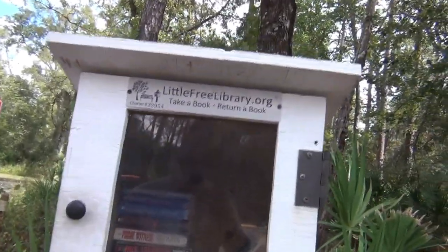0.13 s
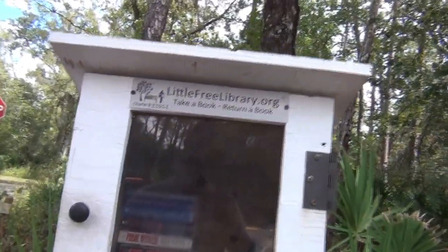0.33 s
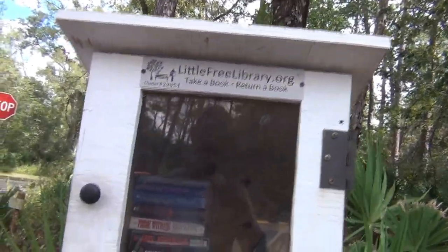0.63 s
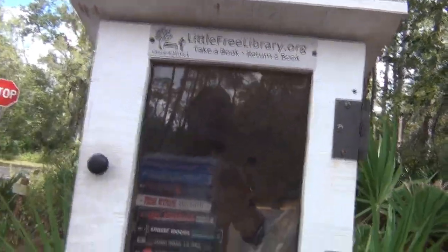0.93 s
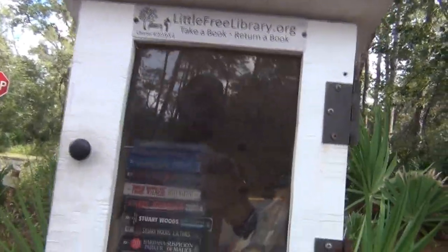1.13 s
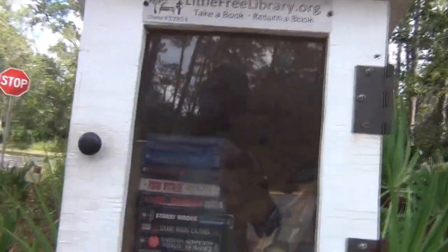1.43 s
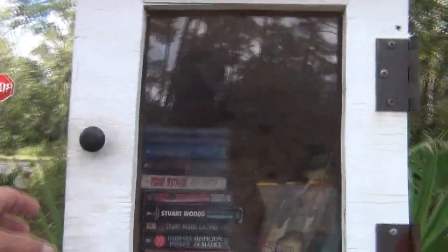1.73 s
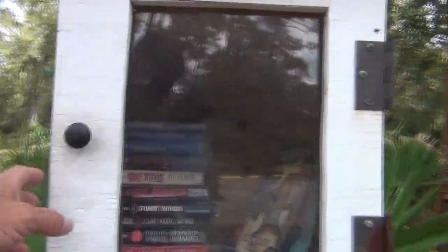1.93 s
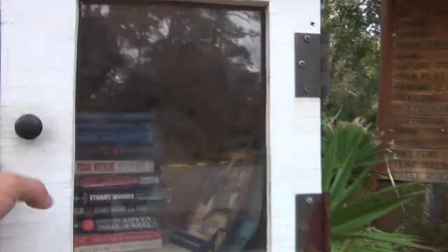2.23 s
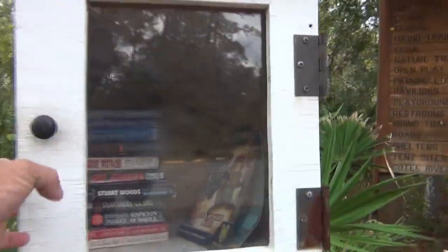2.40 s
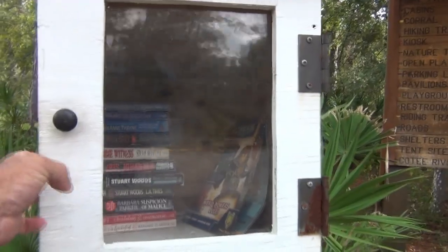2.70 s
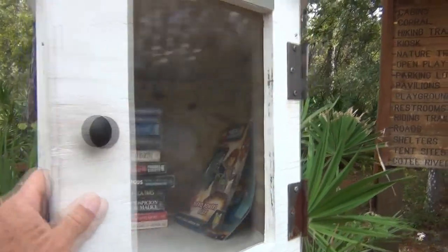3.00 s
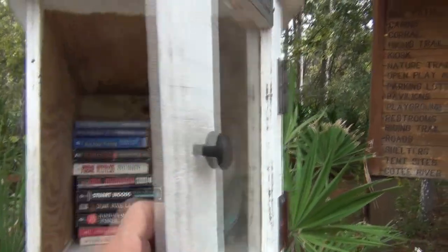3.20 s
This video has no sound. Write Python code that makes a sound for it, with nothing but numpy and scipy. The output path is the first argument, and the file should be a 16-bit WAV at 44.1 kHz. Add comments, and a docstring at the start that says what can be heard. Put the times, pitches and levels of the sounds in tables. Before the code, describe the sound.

A dry metal hinge squeals piercingly, then groans downward as a small wooden door opens outdoors

```python
"""Dry door hinge in the wind

Outdoors among trees, wind buffets a hand-held stereo microphone; feet scuff dry leaves. Twigs, strap and fingers
tick, after one faint bird chirp at the start. A hand pulls a small wooden door off its seat: the hinge chirps,
locks onto two high squeals, then slips into a lower groan that falls as the swing slows. Hinge: unsteady sines in
stick-slip; door: struck panel modes; leaves: ringing grains and noise; ticks and bird: dying bursts of
band noise; wind, flaps and air: shaped noise."""
import sys
import numpy as np
from scipy import signal
from scipy.fft import rfft, irfft
from scipy.io import wavfile
from scipy.ndimage import uniform_filter1d

SR = 44100
rng = np.random.default_rng(int(sys.argv[2]) if len(sys.argv) > 2 else 0)


def invert_db(x):
    """Field ratio 10**(x/20) for x, a level in decibels (scalar or array-like)."""
    u = np.asarray(x, float) / 20
    return 10 ** u


def generate_wav(sig):
    """Save sig (samples, or channels by samples) to the path in sys.argv[1] as 16-bit PCM at SR."""
    pcm = np.round(np.clip(np.atleast_2d(sig).T, -1, 1) * 32767).astype(np.int16)
    wavfile.write(sys.argv[1], SR, pcm)


N = 147735


def rms_one(x):
    """Scale to rms 1."""
    return x / np.sqrt(np.mean(x ** 2) + 1e-20)


def in_time(rows):
    """Columns of a table at every sample; the first column is time in seconds."""
    s, *columns = np.transpose(rows)
    return [np.interp(np.arange(N) / SR, s, c) for c in columns]


def within(rows):
    """1 during the table's span, with 3 ms edges."""
    t = np.arange(N) / SR
    edge_s = .003
    return np.clip(np.minimum(t - rows[0][0], rows[-1][0] + edge_s - t) / edge_s, 0, 1)


def at_hz(points, hz):
    """A spectrum read on a log frequency axis."""
    point_hz, values = np.transpose(points)
    return np.interp(np.log(hz), np.log(point_hz), values)


def drift(corner_hz):
    """Slow chance, spread 1: white noise through two equal one-pole lowpasses."""
    r = np.exp(-2 * np.pi * corner_hz / SR)
    noise = rng.standard_normal(N + SR)
    return rms_one(signal.lfilter([1], [1, -2 * r, r * r], noise)[SR:])


def colour(x, spectrum):
    """Shape a signal by a spectrum in dB."""
    n = x.shape[-1]
    bin_hz = np.arange(n // 2 + 1) * SR / n + 1
    return irfft(rfft(x) * invert_db(at_hz(spectrum, bin_hz)), n)


def stereo_noise(spectrum, alike):
    """Coloured noise with a left-right likeness per frequency; rms 1."""
    c = np.clip(at_hz(alike, np.arange(N // 2 + 1) * SR / N + 1), 0, 1)
    mid, side = rfft(rng.standard_normal((2, N)))
    pair = np.sqrt(1 + c) * mid + np.sqrt(1 - c) * side * [[1], [-1]]
    return rms_one(colour(irfft(pair, N), spectrum))


def pan(x, db):
    """Left louder than right by db; mono becomes two channels."""
    return x * invert_db(np.array([[db / 2], [-db / 2]]))


def ring(clicks, hz, t60_s):
    """A unit click sets a dying sine of height 1 ringing."""
    r, w = invert_db(-60 / (t60_s * SR)), 2 * np.pi * hz / SR
    return signal.lfilter([0, np.sin(w)], [1, -2 * r * np.cos(w), r * r], clicks + 1e-18)


def tone(hz, partials_db, rough=1.0):
    """Sines at multiples of an unsteady pitch; partials_db holds (multiple, rms dB), rough scales both wavers."""
    jitter_hz = rough * 8.8 * drift(500)
    waver_db = rough * .35 * drift(80)
    phase = 2 * np.pi * np.cumsum(hz + jitter_hz) / SR
    partials = sum(np.sqrt(2) * invert_db(db) * np.sin(k * phase + k * k) for k, db in partials_db)
    return invert_db(waver_db) * partials


def squeals():
    """Stick-slip locked onto modes of the pin: near sines."""
    # Lower pin mode. Each row: time in seconds, pitch in Hz, levels of partials 1, 2 and 3 in dB.
    chirp = [(2.82, 4360, -50, -62, -68), (2.827, 4360, -25, -52, -42), (2.834, 4360, -17.5, -53, -42),
             (2.839, 4500, -33, -60, -55), (2.841, 4600, -21, -42, -38), (2.845, 4540, -34, -39, -37),
             (2.849, 4590, -25, -33, -34), (2.853, 4620, -24, -36, -36), (2.856, 4670, -10.5, -35, -36),
             (2.860, 4670, -20, -37, -36), (2.862, 4700, -18, -55, -54), (2.868, 4730, -35, -66, -72),
             (2.875, 4600, -40, -73, -72), (2.885, 4630, -51, -75, -85)]
    # Lower pin mode, two stretches in turn. Each row: time in seconds, pitch in Hz, partials 1, 2 and 3 in dB.
    squeak = [
        [(2.906, 5130, -22, -51, -51), (2.912, 4910, -12, -31, -31), (2.92, 4918, -11, -28, -28),
         (2.934, 4892, -10, -25.5, -21), (2.94, 4850, -24, -44, -42)],
        [(2.94, 5020, -14, -38, -42), (2.946, 4840, -35, -62, -64), (2.954, 4930, -34.5, -54, -70),
         (2.97, 4917, -57, -85, -73), (2.98, 4850, -50, -70, -67), (3.01, 4929, -67, -67, -106)],
    ]
    # Long squeal on the upper pin mode. Each row: time in seconds, pitch in Hz, level in dB.
    squeal = [(2.934, 11150, -42), (2.938, 11160, -20), (2.943, 11490, -8), (2.955, 11530, -12),
              (2.966, 11560, -11), (2.973, 11570, -9.5), (2.988, 11590, -13), (2.998, 11420, -10),
              (3.006, 11440, -10.5), (3.03, 11480, -10.5), (3.05, 11460, -10.5), (3.08, 11540, -10),
              (3.1, 11540, -9), (3.126, 11520, -10.5), (3.131, 11300, -21), (3.143, 11470, -28.5),
              (3.157, 11260, -35), (3.16, 11540, -46), (3.185, 11550, -54), (3.25, 11250, -65)]
    # Rising blip flung by the jump between the squeals. Each row: time in seconds, pitch in Hz, level in dB.
    blip = [(2.935, 5200, -41), (2.939, 6100, -33), (2.943, 6500, -43), (2.948, 6600, -55)]
    # Falling whistle riding on the groan. Each row: time in seconds, pitch in Hz, level in dB.
    whistle = [(3.23, 8883, -54), (3.264, 8483, -47), (3.276, 8493, -65), (3.28, 8340, -45),
               (3.31, 8070, -48), (3.338, 7580, -45), (3.35, 7669, -52)]
    # Mode that beats with the long squeal. Each row: time in seconds, pitch in Hz, level in dB.
    neighbour = [(2.94, 12584, -50), (2.95, 12568, -65), (2.988, 12670, -23), (3.0, 12564, -39),
                 (3.016, 12500, -58), (3.126, 12493, -49), (3.132, 12400, -59), (3.15, 12300, -40),
                 (3.16, 12506, -72)]
    voices = ((chirp, 2.0), (np.vstack(squeak), .6), (squeal, 1.2), (blip, 5.0), (whistle, 6.0))
    out = 0
    for rows, rough in voices:
        hz, *levels_db = in_time(rows)
        levels_db = uniform_filter1d(np.array(levels_db), size=60)
        out = out + within(rows) * tone(hz, enumerate(levels_db, 1), rough=rough)
    hz, db = in_time(neighbour)
    upper = tone(hz, [(1, db)], rough=2.7)
    # the neighbour's image below the long squeal, 9 dB weaker and 1 % flat
    mirror_hz = 2 * in_time(squeal)[0] - hz
    mirror = tone(mirror_hz, [(0.99, db - 9)], rough=2.9)
    return out + within(neighbour) * (upper + mirror)


def groan():
    """A harmonic stack at the slip rate; the higher a partial, the more it flickers on its own."""
    # Slips of the hinge. Each row: time in seconds, rate in Hz.
    slip_rate = [(3.06, 1070), (3.088, 1020), (3.1, 975), (3.122, 937), (3.14, 895), (3.17, 915),
                 (3.182, 880), (3.203, 837), (3.215, 860), (3.25, 868), (3.3, 885), (3.31, 857),
                 (3.322, 810), (3.35, 775)]
    # Partials of the groan. Each row: time in seconds, levels of partials 1 to 8 in dB.
    partial_rows = [(3.06, -59, -80, -80, -80, -80, -80, -80, -80),
                    (3.082, -45, -65, -75, -72, -72, -80, -80, -80),
                    (3.09, -38, -54, -72, -75, -80, -80, -80, -80),
                    (3.1, -33, -49, -62, -65, -72, -80, -80, -80),
                    (3.112, -28, -42, -52, -66, -75, -80, -80, -80),
                    (3.123, -38, -44, -44, -63, -75, -80, -80, -80),
                    (3.136, -41, -36.5, -50, -57, -61, -80, -80, -80),
                    (3.148, -47, -36.5, -56, -56, -66, -80, -80, -80),
                    (3.168, -33.5, -46, -51, -59, -68, -70, -80, -80),
                    (3.175, -43, -45, -54, -58, -68, -66, -80, -80),
                    (3.183, -39, -33, -50, -56, -46, -58, -68, -70),
                    (3.204, -36.5, -28, -41, -41, -46, -62, -53, -68),
                    (3.214, -36, -30.5, -52, -52, -45, -54, -68, -70),
                    (3.24, -34.5, -30, -47, -47, -54, -67, -77, -77),
                    (3.255, -39, -32, -49, -45, -54, -60, -66, -68),
                    (3.268, -41, -42, -47, -45, -74, -62, -70, -72),
                    (3.29, -42, -54, -44, -47, -55, -56, -72, -72),
                    (3.302, -44, -53, -47, -49, -53, -62, -68, -72),
                    (3.311, -36, -35, -53, -51, -61, -63, -70, -66),
                    (3.32, -49, -44, -57, -42.5, -56, -60, -58, -58),
                    (3.33, -50, -35, -48, -45, -55, -59, -66.5, -56),
                    (3.35, -43, -46, -52, -49, -52, -62, -57, -54)]
    hz = uniform_filter1d(in_time(slip_rate)[0], size=300)
    partials = []
    for k, db in enumerate(in_time(partial_rows), 1):
        flicker_db = 1.5 * np.log2(k + 1) * drift(56)
        partials.append((k, db + flicker_db))
    return within(partial_rows) * tone(hz, partials, rough=.6)


def echoes(x):
    """A few short reflections, different at each ear and inverted at the right."""
    # Reflections off box and trunks. Each row: delay in seconds, left level in dB, right level in dB.
    reflections = [(.004, -15.5, -53), (.011, -32, -30), (.019, -40, -27)]
    out = np.zeros((2, N))
    for delay_s, left_db, right_db in reflections:
        d = int(delay_s * SR)
        out[:, d:] += x[:-d] * invert_db(np.array([[left_db], [right_db]])) * [[1], [-1]]
    return out


def hinge():
    """Squeals and groan, each placed in stereo, with their reflections."""
    high, low = squeals(), groan()
    lead_s = .000006   # the right port is a little nearer the hinge
    bin_hz = np.arange(N // 2 + 1) * SR / N
    turn = np.exp(1j * np.pi * lead_s * bin_hz * np.array([[-1], [1]]))
    placed_high = irfft(rfft(pan(high, -0.5)) * turn, N)
    return placed_high + pan(low, 2.7) + echoes(high + low)


def door():
    """The door leaves its seat: soft blows ring the panel's modes, each with strengths of its own."""
    # Dull knocks of the panel. Each row: time in seconds, relative level in dB.
    knocks = [(2.771, -18.5), (2.787, -17.5)]
    # Modes of the panel. Each row: frequency in Hz, relative level in dB, t60 in seconds.
    panel = [(84, -7, 0.088), (146.8, 5.5, 0.25), (190, -16, 0.052), (338, -5.5, 0.033), (505, -1.5, 0.041),
             (815, -1, 0.022)]
    s, db = np.transpose(knocks)
    strengths_db = rng.normal(0, 3.4, (len(knocks), len(panel)))
    out = 0
    for m, (hz, mode_db, t60_s) in enumerate(panel):
        blows = np.zeros(N)
        blows[(s * SR).astype(int)] = invert_db(db + mode_db - 9.5 + strengths_db[:, m])
        out = out + ring(blows, hz, t60_s)
    return pan(out, .7)


def leaf_crackle(leaf):
    """Chance grains, each ringing one of 20 short resonances, plus some plain noise; rms 1."""
    grains_per_s, ring_cycles = 2200, 2.05   # cycles until 60 dB down
    grain_db = -0.5 * np.minimum(rng.exponential(1, N), 5) + 1.8 * drift(60)
    grains = invert_db(grain_db) * rng.choice([-1, 1], N)
    grains = grains * (rng.random(N) < grains_per_s / SR)
    dealt = rng.integers(0, 20, N)
    crackle = 0
    for k, hz in enumerate(np.geomspace(700, 15000, 20)):
        band = ring(grains * (dealt == k), hz, ring_cycles / hz)
        crackle = crackle + rms_one(band) * np.sqrt(hz)
    return rms_one(colour(rms_one(crackle) + 0.48 * rng.standard_normal(N), leaf))


def leaves():
    """Feet in dry leaves: crackle swells and fades in each scuff, over a smooth, flickering rustle."""
    # Rustle close by. Each row: time in seconds, relative level in dB.
    rustle = [(0, -43), (.8, -42.5), (1.0, -42), (1.45, -42.5), (1.85, -44.5), (2.0, -40), (2.3, -39.5),
              (2.5, -45), (2.65, -42.5), (2.82, -31.5), (2.9, -43), (3.35, -45.5)]
    # Scuffs. Each row: start in seconds, swell in seconds, fade in seconds, level in dB, centre in Hz.
    scuffs = [(0.91, 0.024, 0.038, -45.5, 6100), (1.07, 0.055, 0.036, -40.5, 2400),
              (1.27, 0.015, .02, -51, 8000), (1.35, 0.021, .012, -39, 4020),
              (1.543, 0.041, 0.038, -30.5, 2870), (1.595, 0.018, 0.032, -44, 9100),
              (2.088, 0.04, 0.048, -40.5, 5350), (2.17, 0.031, 0.0092, -44, 7000),
              (2.119, 0.06, 0.026, -36.5, 1370), (2.66, 0.036, 0.074, -48.5, 7800),
              (2.765, 0.017, 0.056, -45.5, 3000), (3.23, .025, 0.031, -47, 9000)]
    # Spectrum of leaves. Each row: frequency in Hz, relative level in dB per Hz.
    leaf = [(350, 3), (600, 1), (779, -2), (906, -1), (1280, -3.5), (4520, -9.5), (5560, -8.5),
            (12300, -9.5), (16000, -20)]
    t = np.arange(N) / SR
    crackle = leaf_crackle(leaf)
    rustle_db = in_time(rustle)[0] - 4.5 + 1.2 * drift(8.7)
    out = invert_db(rustle_db) * stereo_noise(leaf, [(600, 0.91), (16000, 0.49)])
    skirt_db = -9   # two octaves off the centre
    for s, swell_s, fade_s, db, hz in scuffs:
        a, b = int(s * SR), min(int((s + swell_s + 3 * fade_s) * SR), N)
        u = t[a:b] - s
        rise = np.sin(.5 * np.pi * u / swell_s) ** 2
        fall = np.exp(-((u - swell_s) / fade_s) ** 2)
        shape = np.where(u < swell_s, rise, fall)
        hump = [(hz / 4, skirt_db), (hz, 0), (hz * 4, skirt_db)]
        out[:, a:b] += pan(invert_db(db) * shape * rms_one(colour(crackle[a:b], hump)), 2.4)
    return out


def bird_and_ticks():
    """One faint bird chirp, then ticks of twigs, strap and fingers: bursts of dying noise in a band."""
    # The narrow first row is the bird, the others are ticks.
    # Each row: start in seconds, peak in dB, centre in Hz, width in octaves, t60 in seconds, pan in dB.
    burst_rows = [(.019, -37, 7450, 0.069, 0.067, 1), (0.069, -37.5, 3020, 0.41, .025, -2),
                  (.177, -39.5, 5000, .9, .025, .1), (.250, -37, 9000, 1, .025, 5),
                  (0.385, -34, 6000, 2.5, 0.019, 3), (.609, -38, 12000, .8, .03, 5),
                  (.873, -35, 3360, 1.8, .03, .1), (1.074, -32, 5000, 4.4, .03, .1),
                  (1.143, -39, 3000, 1.8, .02, 3), (1.159, -23, 3800, 2.44, 0.03, 3.5),
                  (1.288, -33, 7040, 1.8, 0.023, 3), (1.373, -31, 4530, 2.3, 0.021, 3),
                  (1.68, -40.5, 5440, 1.2, .02, 6), (1.966, -32.5, 10200, 0.85, 0.028, .5),
                  (2.270, -26.5, 8000, 1.1, 0.023, 7), (2.307, -26, 2780, 1.8, 0.053, 3),
                  (2.356, -22, 6370, 3.5, 0.016, .5), (2.373, -34, 10900, .9, 0.023, .1),
                  (2.408, -31, 10500, .9, 0.034, 4), (2.449, -32.5, 1920, 1.2, 0.031, 3),
                  (2.521, -39, 1570, 0.99, 0.024, .5), (2.621, -40, 6000, 2.7, .02, 3),
                  (2.663, -27, 11000, 3.2, 0.017, 1.5), (2.751, -19, 9000, 1.5, .04, 3),
                  (2.754, -21.5, 2460, 2.6, 0.045, 1), (2.793, -19.5, 5700, 2.2, 0.036, 1)]
    out, u = np.zeros((2, N + SR)), np.arange(4000) / SR
    noises = rng.standard_normal((len(burst_rows), len(u)))
    for (s, db, hz, octaves, t60_s, pan_db), noise in zip(burst_rows, noises):
        edges_hz = np.clip(hz * 2 ** (octaves * np.array([-.5, .5])), 100, 19000)
        band = signal.butter(2, edges_hz, "band", fs=SR, output="sos")
        burst = signal.sosfilt(band, noise * invert_db(-60 * u / t60_s))
        i = int(s * SR)
        out[:, i:i + len(u)] += pan(invert_db(db) * burst / np.abs(burst).max(), pan_db)
    return out[:, :N]


def wind():
    """Turbulence at the ports: two lumpy noise layers; shared lumps make the upper flare with the lower."""
    # Gusts. Each row: time in seconds, rumble level in dB, upper buffeting relative to it in dB.
    gust = [(0.0, -31.5, -10), (0.12, -36, -12), (0.15, -25, -12.5), (0.19, -21.5, -4.5), (0.21, -33.5, -4),
            (0.25, -16.5, -3.5), (0.33, -26, -8), (0.37, -15, -3), (0.48, -25.5, 4.5), (0.5, -10.5, -7.5),
            (0.53, -21, 11), (0.57, -15, -13), (0.59, -21.5, 7), (0.61, -23.5, 3.5), (0.82, -21, 1),
            (0.87, -28, 7), (0.94, -16, -4.5), (1.04, -21.5, -10.5), (1.07, -24, 0), (1.23, -16, -5.5),
            (1.27, -29, 0), (1.3, -18.5, -1.5), (1.38, -23, -1), (1.41, -27.5, -1), (1.54, -26, -5),
            (1.56, -22, 0.5), (1.7, -30.5, -13), (1.73, -27.5, 10.5), (1.76, -15, -5.5), (1.83, -28.5, -3),
            (1.87, -17.5, 1.5), (1.9, -31, -17), (2.0, -39.5, -15), (2.06, -25.5, -24), (2.15, -49.5, -7),
            (2.29, -34.5, -16), (2.31, -52.5, 13.5), (2.39, -31.5, -15), (2.43, -27.5, -15.5),
            (2.5, -44.5, 4.5), (2.57, -47.5, -3), (2.59, -35, -18), (2.71, -45, -11), (2.79, -22, -5),
            (2.83, -34.5, -5.5), (2.96, -54.5, 6.5), (3.27, -48, -7), (3.35, -55, -8)]
    # Spectrum of the lower layer. Each row: frequency in Hz, relative level in dB per Hz.
    rumble = [(12, -43), (20, -9.5), (92, 3.5), (160, -0.5), (260, -7.5), (340, -26), (570, -120)]
    # Spectrum of the upper layer. Each row: frequency in Hz, relative level in dB per Hz.
    buffet = [(100, -11), (170, -0.5), (217, -4.5), (350, -8.5), (576, -24), (777, -27), (1600, -52),
              (2080, -91), (3520, -120)]
    # Each row: frequency in Hz, left-right likeness from 0 to 1.
    wind_alike = [(60, 0.96), (120, 0.81), (240, 0.64), (480, 0.29), (950, 0.58)]
    db, rel_db = in_time(gust)
    lumps = drift(30)
    low = stereo_noise(rumble, wind_alike) * invert_db(1 * lumps)
    high_lumps_db = 3.5 * (.6 * lumps + 0.75 * drift(24))
    high = stereo_noise(buffet, wind_alike) * invert_db(high_lumps_db)
    lag_s = 0.00038   # the left port meets the buffeting this much later
    high[0] = np.interp(np.arange(N) - lag_s * SR, np.arange(N), high[0])
    return pan(invert_db(db) * (rms_one(low) + invert_db(rel_db) * rms_one(high)), 0.59)


def flaps():
    """Sharp flaps of wind across the ports: short puffs of dull noise, mostly separate at each port."""
    # Each row: start in seconds, relative peak in dB, upper corner in Hz.
    flap_rows = [(0.254, -29, 740), (0.375, -31, 746), (0.445, -53, 750), (0.511, -31, 750),
                 (0.582, -31, 750), (0.704, -29, 740), (0.954, -30, 750), (1.076, -35, 745),
                 (1.18, -28, 754), (1.208, -32.5, 750), (1.301, -35, 750), (1.563, -30, 735),
                 (1.733, -31, 750), (1.787, -37, 745), (1.856, -40.5, 750), (2.059, -45, 750)]
    rise_s, t60_s = 0.0047, 0.031
    out, u = np.zeros((2, N)), np.arange(5000) / SR
    shape = (1 - np.exp(-u / rise_s)) * invert_db(-60 * u / t60_s)
    noises = rng.standard_normal((len(flap_rows), 3, len(u)))
    for (s, db, hz), noise in zip(flap_rows, noises):
        ports = noise[:2] + 0.46 * noise[2]   # the third noise is common to both
        band = signal.butter(2, [220, hz], "band", fs=SR, output="sos")
        puff = signal.sosfilt(band, ports * shape)
        i = int(s * SR)
        out[:, i:i + len(u)] += invert_db(db + 7) * puff / np.abs(puff).max()
    return out


def air():
    """Steady background: coloured noise, nearly alike at both ports."""
    # Spectrum of the air. Each row: frequency in Hz, relative level in dB per Hz.
    air_spectrum = [(24, -45), (40, -20), (100, -6), (180, -8.5), (391, -8.5), (660, -6), (980, -12.5),
                    (2220, -22), (9260, -31), (16000, -31.5)]
    return invert_db(-49) * stereo_noise(air_spectrum, [(150, 1), (2000, 0.78), (16000, 1.0)])


def scene():
    """Sum of all sources."""
    return hinge() + door() + leaves() + bird_and_ticks() + wind() + flaps() + air()


def low_pass(x):
    """Removes everything above the highest recorded frequency."""
    return signal.sosfilt(signal.butter(12, 16310, fs=SR, output="sos"), x)


def record(dry):
    """The top is cut: 50 dB down from 16.4 kHz."""
    lowpass = signal.cheby2(10, 50, 16400, fs=SR, output="sos")
    mix = signal.sosfilt(lowpass, dry)
    return low_pass(mix)


dry = scene()
out = record(dry)
generate_wav(out)
```